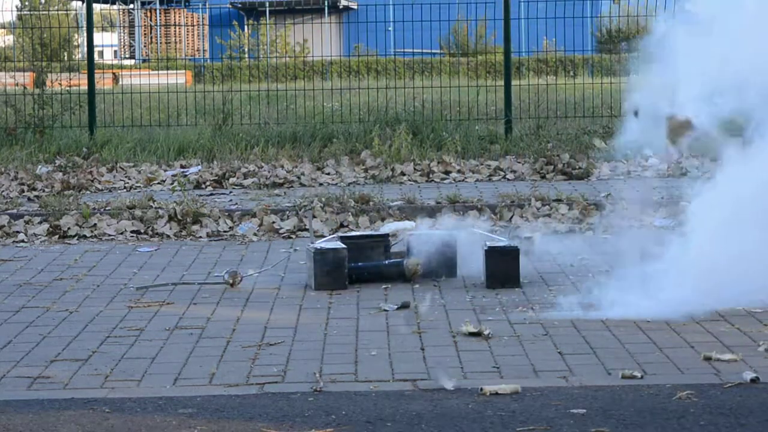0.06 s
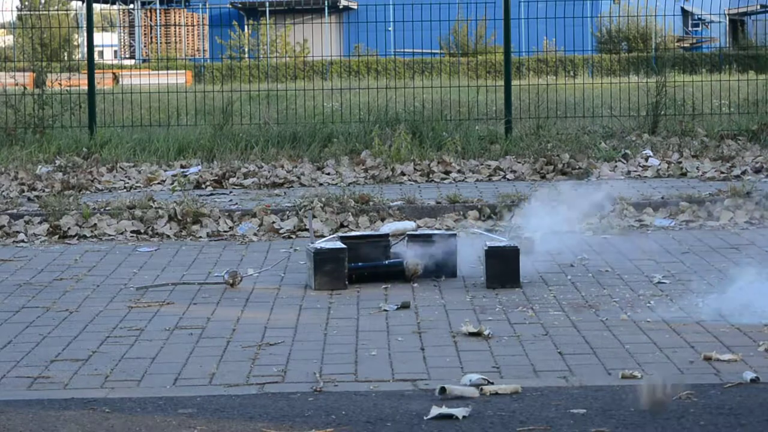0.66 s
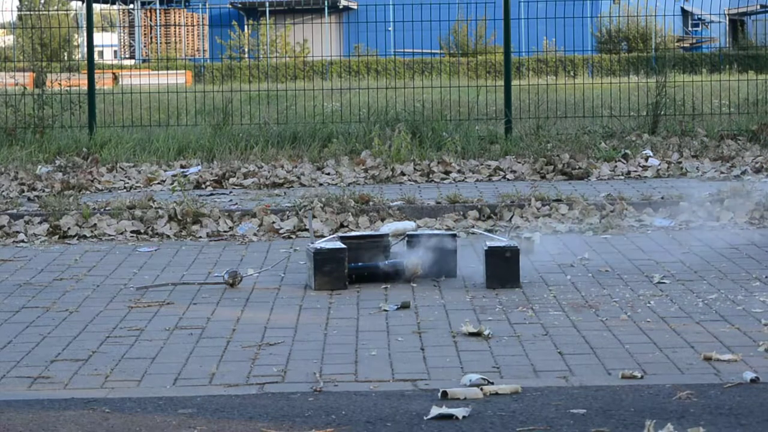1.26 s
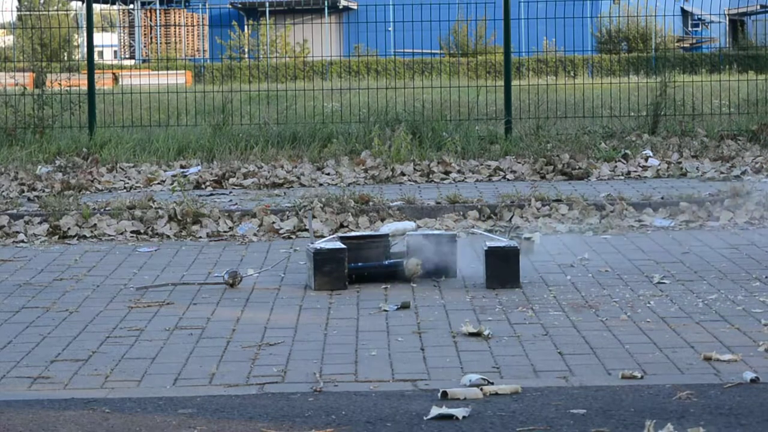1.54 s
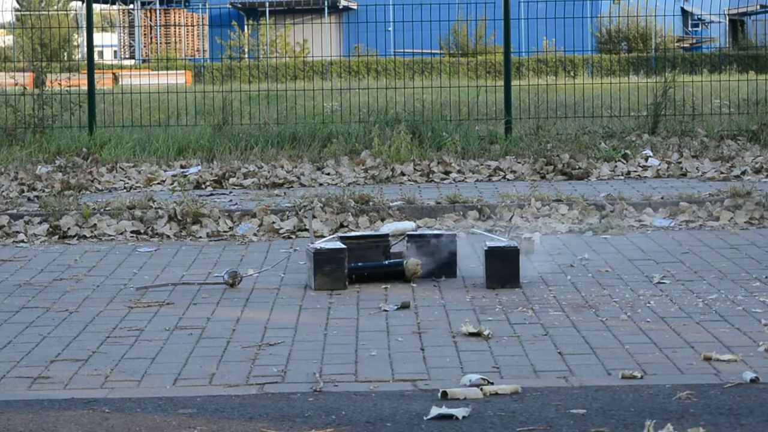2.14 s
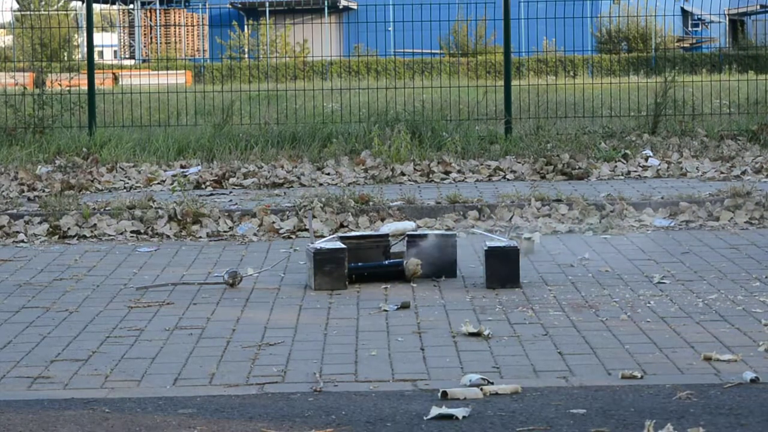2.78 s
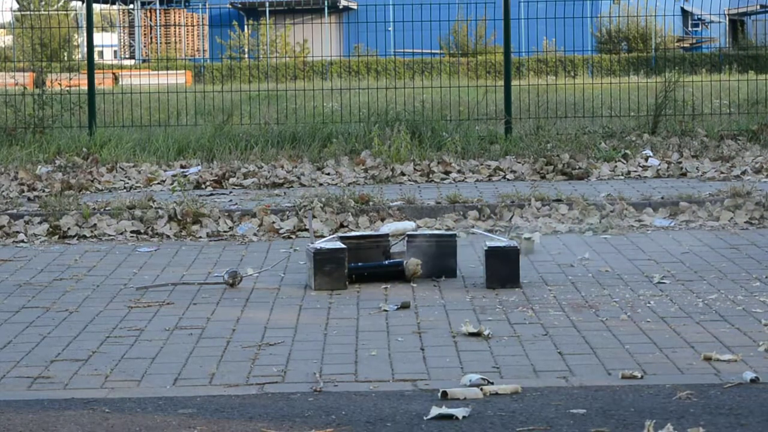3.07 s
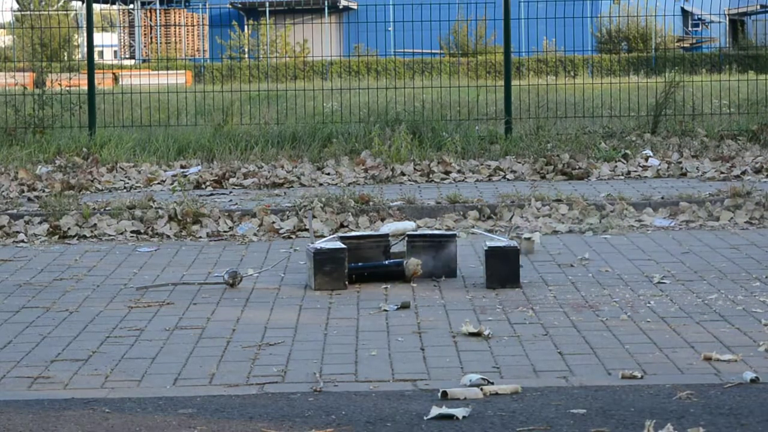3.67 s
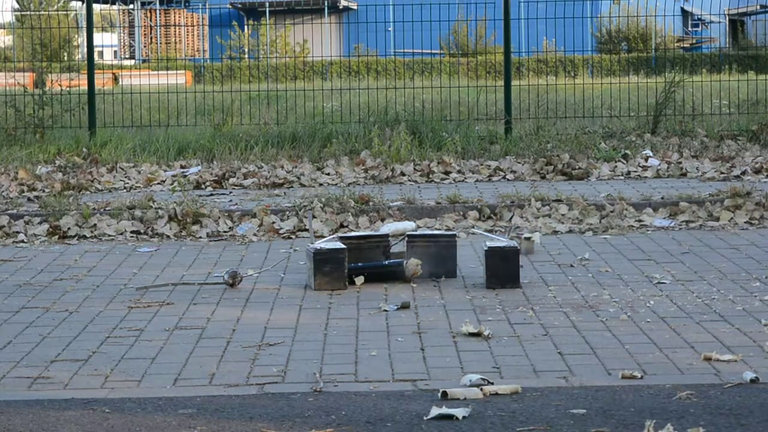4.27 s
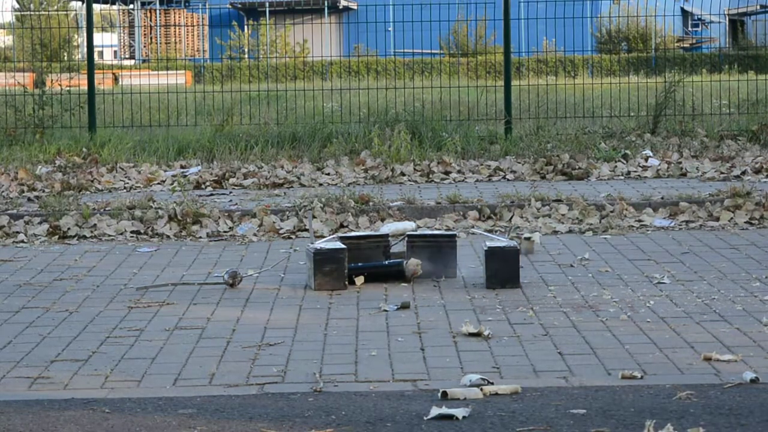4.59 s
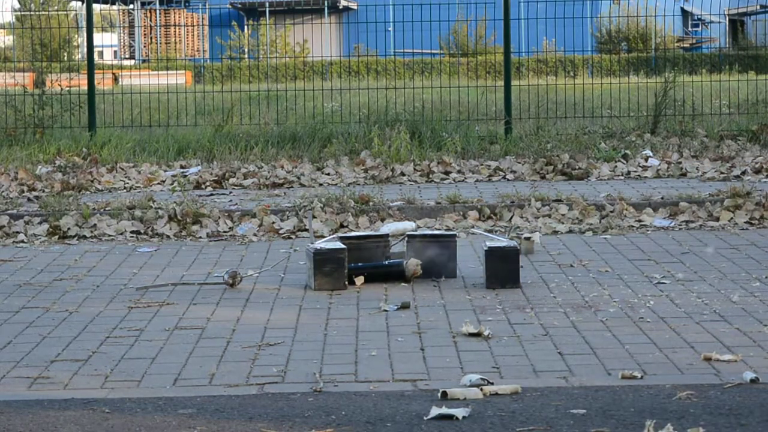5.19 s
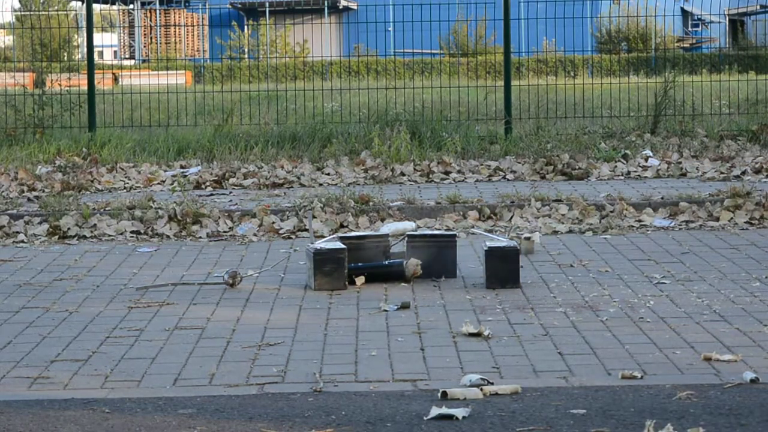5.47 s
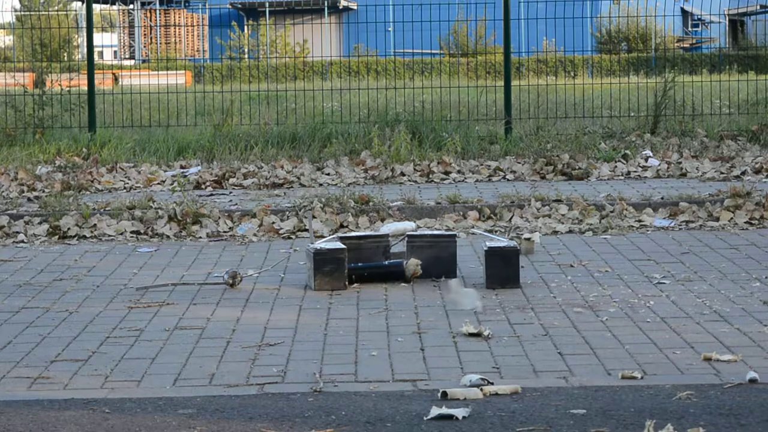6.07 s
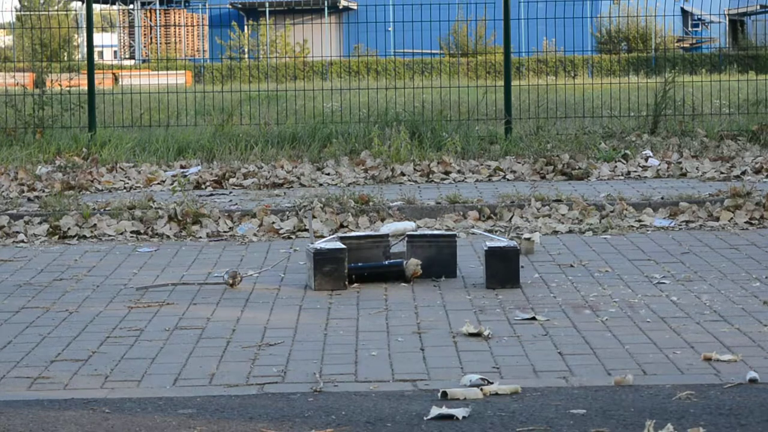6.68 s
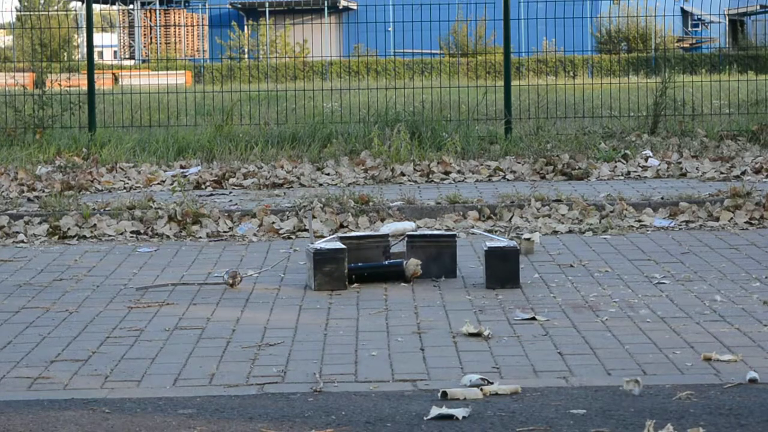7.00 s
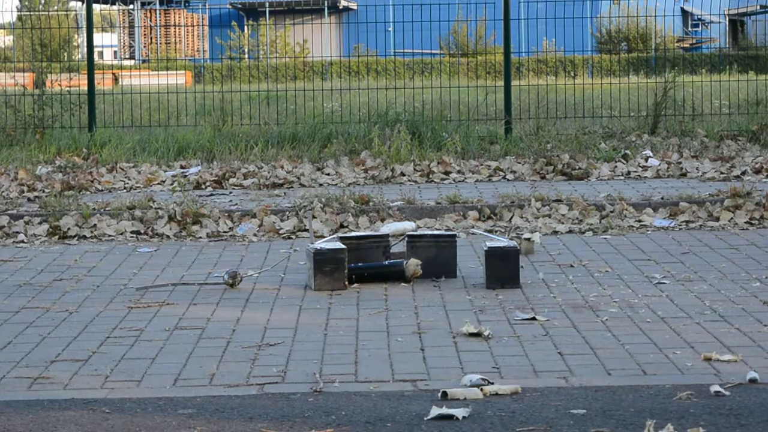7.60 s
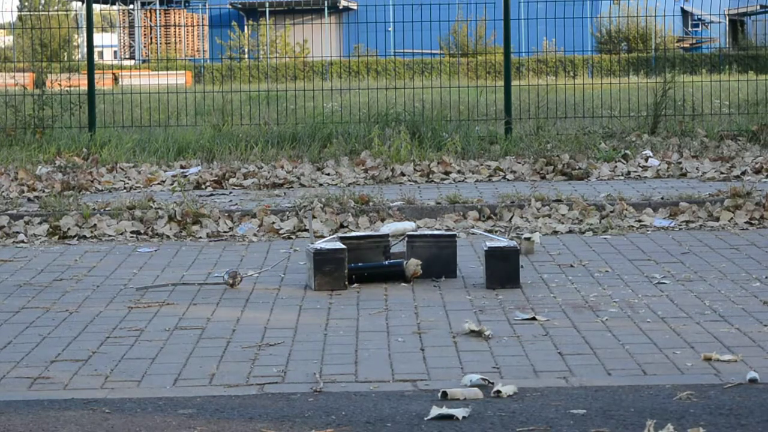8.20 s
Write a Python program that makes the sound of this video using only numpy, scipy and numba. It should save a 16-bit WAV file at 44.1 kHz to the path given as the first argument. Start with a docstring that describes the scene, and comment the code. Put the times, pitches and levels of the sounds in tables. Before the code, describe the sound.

A few light clicks of debris landing on pavement sound as gusts of wind begin to strike the microphone in an open yard. The wind rumbles and sputters unevenly between left and right, with a faint hiss rising and falling along with it. It drops away briefly, with barely audible caws from a far bird, then comes back in closely spaced, slightly brighter gusts until the end.

```python
"""A paved yard, where gusts of wind hit the two ports (openings) of a camera microphone.
Each port rumbles on its own as a gust builds, holds and drops away, leaving a weak wake.
Faster eddies (swirls of air) brighten the rumble and tear into short spits, and a thin hiss
comes and goes with the gusts. A few bits of debris land on the paving; a far bird caws faintly."""
import sys
import numpy as np
from scipy import signal
from scipy.fft import rfft, irfft, next_fast_len
from scipy.io import wavfile
from scipy.ndimage import uniform_filter1d, map_coordinates
from numba import njit

SR = 44100
rng = np.random.default_rng(int(sys.argv[2]) if len(sys.argv) > 2 else 0)


def waveform_to_disk(signal):
    """Save audio, clipped to [-1, 1], as 16-bit WAV at the path in sys.argv[1]."""
    frames = np.transpose(np.atleast_2d(signal))
    scaled = np.clip(frames, -1, 1) * 32767
    samples = np.round(scaled).astype(np.int16)
    wavfile.write(sys.argv[1], SR, samples)


N = 372644

# calls of the far bird: (start [s], length [s], relative level [dB], pitch [Hz], throat resonance [Hz])
BIRD_CAWS = [(1.141, 0.07, -61, 196, 1500), (1.571, 0.068, -53.5, 203.4, 1460),
             (1.805, 0.039, -50, 202, 1510), (2.358, 0.056, -53, 198.6, 1470),
             (2.539, 0.051, -63.5, 200, 1500), (2.695, 0.045, -75.5, 205.6, 1440),
             (2.915, 0.039, -54, 192, 1450)]
# bits of debris landing: (time [s], peak level [dB], brightness [Hz])
LANDINGS = [(0.3425, -46.5, 4450), (0.352, -38.5, 1300), (0.807, -36.5, 8850), (0.819, -31.5, 1980),
            (0.979, -32, 4500)]
# tones one bit rings with: (frequency [Hz], relative level [dB], time to fade by 60 dB [s])
DEBRIS_TONES = [(756, -16, 0.07), (910, -4, 0.018), (1640, -0.5, 0.016), (2600, 1.5, 0.0071),
                (4160, -7.5, 0.016), (8400, -37, 0.0091)]
# tone colour of the hiss: (frequency [Hz], relative level [dB])
HISS_COLOUR = [(80, -14), (250, -13), (1000, 11), (2200, 5.5), (3700, 3), (4900, -3.5), (6100, -6.5),
               (7800, -18), (10600, -15.5), (13000, -26), (15500, -47.5)]
# tone colour of tearing eddies: (frequency [Hz], relative level [dB])
SPIT_COLOUR = [(300, -4), (900, -1.5), (1600, 4), (3000, -7.5), (6000, -23.5), (8000, -26), (11000, -34),
               (15500, -38.5)]
# how a port responds to wind: (frequency [Hz], relative level [dB])
PORT_COLOUR = [(20, -33.5), (55, -26), (90, -9), (135, -12.5), (200, -2.5), (320, 1), (550, 4), (1000, 1.5),
               (3000, -18.5)]
# buffets, the sharpest shoves of air: (time [s], left surge [relative], right surge [relative])
SHARP_BUFFETS = [(0.566, 0, 2.8), (0.873, 1.6, 0), (1.049, 2.1, 1.0), (1.251, 0, 2.0), (1.286, 2.0, 0.6),
                 (1.919, 2.9, 1.0), (2.172, 2.0, 0), (2.975, 1.0, 2.9), (3.308, 1.0, 3.0), (3.559, 2.2, 0),
                 (3.628, 1.6, 0.6), (3.733, 2.0, 0.9), (3.837, 2.0, 1.0), (3.962, 0, 2.8),
                 (4.053, 1.9, 0.7), (4.186, 2.2, 1.4), (4.255, 1.8, 1.3), (4.403, 1.8, 1.1),
                 (4.929, 1.9, 1.2), (5.018, 1.8, 0.7), (5.311, 1.5, 0.8), (5.449, 2.0, 0), (5.571, 2.0, 0),
                 (5.669, 1.8, 0), (5.779, 1.8, 0.9), (6.07, 2.3, 1.2), (6.125, 1.7, 0), (6.776, 1.4, 0),
                 (6.91, 1.4, 0), (7.02, 1.8, 0), (7.069, 1.6, 0), (7.277, 2.2, 0.9), (7.431, 0, 2.1),
                 (7.623, 1.8, 0), (7.791, 1.5, 1.6), (7.833, 0, 2.0), (8.237, 1.8, 1.3)]
# gusts; the rumble's treble falls away above the corner, so a higher corner sounds brighter:
# (start [s], length [s], left level [dB], right level [dB], corner [Hz], hiss level [dB])
WIND_GUSTS = [(0.318, 0.045, -67, -76, 710, -72), (0.514, 0.045, -33.5, -35, 640, -59),
              (0.631, 0.123, -46, -35, 455, -63), (0.764, 0.084, -47, -39.0, 457, -64),
              (0.844, 0.085, -30.5, -29.5, 653, -58), (0.914, 0.12, -36.5, -29.5, 970, -62.5),
              (1.093, 0.2, -56, -46, 590, -73), (1.194, 0.2, -33, -32.5, 810, -59.5),
              (1.499, 0.11, -38.5, -55, 427, -69), (1.631, 0.066, -34, -38.5, 530.0, -64.5),
              (1.708, 0.15, -41, -42, 475, -67.5), (1.873, 0.043, -36.0, -33, 840, -58),
              (1.938, 0.25, -38.5, -43.5, 505, -67), (2.197, 0.12, -47, -51.5, 476, -71),
              (2.351, 0.046, -43.5, -39, 500, -67), (2.446, 0.062, -44.5, -51, 440.0, -72.5),
              (2.509, 0.12, -59.5, -55, 440, -80.0), (2.619, 0.13, -75.5, -72, 388, -99),
              (2.917, 0.13, -46, -38.5, 487, -65), (3.028, 0.072, -29.5, -35.5, 780, -59.5),
              (3.183, 0.048, -39, -42, 394, -71.5), (3.245, 0.058, -34, -35.5, 616, -60.5),
              (3.513, 0.241, -30, -30.5, 1210, -57.5), (3.755, 0.13, -37, -35, 925, -68),
              (3.896, 0.17, -32.5, -40.5, 1000, -64), (4.047, 0.15, -39.5, -56, 800, -69),
              (4.206, 0.12, -31, -38.5, 643, -65.0), (4.345, 0.26, -32, -35, 920, -65),
              (4.545, 0.12, -35, -40, 766, -76), (4.679, 0.062, -44.5, -49, 654, -80),
              (4.765, 0.08, -62, -67, 420.0, -92), (4.879, 0.055, -34, -47.0, 443, -68.5),
              (4.969, 0.13, -34, -44.0, 503, -67), (5.09, 0.11, -46.5, -47, 540.0, -73),
              (5.188, 0.16, -32.5, -40.5, 810.0, -63.5), (5.368, 0.21, -34.5, -40.5, 940, -61),
              (5.534, 0.27, -34, -41, 980, -62.5), (5.82, 0.098, -34.5, -43, 517, -69),
              (5.942, 0.048, -31.5, -37.5, 585, -66.5), (5.998, 0.13, -34.5, -46, 1260, -63.5),
              (6.198, 0.091, -38.5, -37.5, 535, -67.5), (6.376, 0.2, -36, -41.5, 755, -63.5),
              (6.592, 0.15, -33.5, -40.5, 920, -63), (6.721, 0.22, -30.5, -35, 1340, -61.5),
              (6.949, 0.162, -32.0, -39, 990, -70), (7.108, 0.2, -34.5, -35, 1037, -70.5),
              (7.351, 0.2, -38.5, -39, 886, -70.5), (7.576, 0.18, -33.5, -35.5, 660, -68),
              (7.752, 0.19, -34, -34, 980, -72), (7.944, 0.21, -39.0, -35.5, 865, -72.5),
              (8.152, 0.14, -37, -34.0, 990, -71.0), (8.291, 0.24, -43, -36.0, 704, -76.5)]

TOP_HZ = 15750
TIME = np.arange(N) / SR
GUST_TIME = np.arange(0, N / SR, .002)  # coarse steps are enough for the gusts' rise and fall


def gain(db):
    """Turn decibels into a factor to multiply by."""
    return 10 ** (np.asarray(db) / 20)


def unit_rms(x):
    """Scale a signal so its average strength (rms) is 1."""
    return x / np.sqrt(np.mean(x ** 2))


def coloured_noise(colour):
    """Noise of strength 1, shaped by a tone colour table."""
    hz, db = np.transpose(colour)
    size = next_fast_len(N, True)
    bin_hz = np.maximum(np.arange(size // 2 + 1) * SR / size, 1)
    shape = gain(np.interp(np.log(bin_hz), np.log(hz), db))
    return unit_rms(irfft(rfft(rng.standard_normal(size)) * shape, size)[:N])


def wobble(per_s):
    """A smooth random curve that takes about per_s new values a second."""
    steps = np.clip(rng.standard_normal(N // 10), -2, 2)
    return unit_rms(map_coordinates(steps, [TIME * per_s], order=2, mode="wrap"))


@njit
def filter_loop(x, tuning, damping):
    """Run a state-variable filter one sample at a time, so its tuning can move."""
    out, band, low = np.empty((2, len(x))), 0., 0.
    for i in range(len(x)):
        g = tuning[i]
        v = (band + g * (x[i] - low)) / (1 + g * (g + damping))
        out[0, i], out[1, i] = low + g * v, damping * v
        band, low = 2 * v - band, low + 2 * g * v
    return out


def resonate(x, hz, damping):
    """Filter x two ways: [0] keeps what is below hz, [1] keeps what is near hz."""
    tuning = np.tan(np.pi * np.clip(hz, 20, TOP_HZ) / SR) * np.ones(len(x))
    return filter_loop(x + 1e-18, tuning, float(damping))


def low_cut(x, hz):
    """Gently take away the bass below hz."""
    return signal.sosfilt(signal.butter(2, hz, "high", fs=SR, output="sos"), x)


def add(track, start_s, sound):
    """Mix a sound into a track at the given time."""
    start = int(start_s * SR)
    track[start:start + len(sound)] += sound[:N - start]


def noise_burst(t, fade_s):
    """Noise that dies away by 60 dB in fade_s."""
    return rng.standard_normal(len(t)) * np.exp(-np.log(1000) * t / fade_s)


def bird(pitch_fall=0.16, rasp=0.2, bird_db=-2, echo_db=-6):
    """Raspy caws: pulses falling in pitch ring the throat and echo faintly off the buildings."""
    caws = np.zeros(N)
    for start, length, db, pitch_hz, throat_hz in BIRD_CAWS:
        progress = np.linspace(0, 1, int(length * SR))
        cycles = np.cumsum(pitch_hz * (1 - pitch_fall * (progress - .5))) / SR
        pulses = np.diff(np.floor(cycles), prepend=0)
        voice = pulses + rasp * (1 - cycles % 1) ** 2 * rng.standard_normal(SR)[:len(progress)]
        for _ in range(2):
            voice = resonate(voice, throat_hz, damping=0.36)[1]
        add(caws, start, gain(db + bird_db) * unit_rms(voice) * np.sin(np.pi * progress))
    echo = noise_burst(TIME[:SR // 2], fade_s=0.35)
    return caws + gain(echo_db) * signal.fftconvolve(caws, echo / np.linalg.norm(echo))[:N]


def debris(crack_db=6, ring_db=-4):
    """Each bit lands with a crack and a brief ring, some bright, some dull."""
    ticks, t = np.zeros(N), TIME[:SR // 10]
    ring = sum(gain(db - 60 * t / fade_s) * np.sin(2 * np.pi * hz * t)
               for hz, db, fade_s in DEBRIS_TONES)
    for start, db, bright_hz in LANDINGS:
        crack = resonate(noise_burst(t, fade_s=0.026), hz=2400, damping=1.2)[1]
        tick = resonate(gain(ring_db) * ring + gain(crack_db) * crack, bright_hz, 1.5)[0]
        tick = low_cut(tick, 500)  # a small bit gives off no bass
        add(ticks, start, gain(db) * tick / np.abs(tick).max())
    return ticks


def gust_clock():
    """One row per gust: seconds since it began, seconds it has blown, seconds since it stopped."""
    start, length = np.transpose(WIND_GUSTS)[:2, :, None]
    age = GUST_TIME - start
    return age, np.clip(age, 0, length), np.maximum(age - length, 0)


def hiss_level(lead_s=0.017, rise_s=0.059, sag_db_per_s=24.5, fall_db_per_s=184.5, calm_db=-112):
    """Hiss level in dB: it starts just before each gust, sags while it blows, then fades."""
    peak_db = np.array(WIND_GUSTS)[:, -1:]
    age, blown, after = gust_clock()
    rise = np.clip((age + lead_s) / rise_s, 0, 1) ** 2
    swell = rise * gain(peak_db - sag_db_per_s * blown - fall_db_per_s * after)
    power = (swell ** 2).sum(axis=0) + gain(calm_db) ** 2
    return np.interp(TIME, GUST_TIME, 10 * np.log10(power))


def hiss(boost_db=6.5, side_db=-13, wide_db=-4, wide_hz=9000, flicker_db=1.5):
    """Airy hiss from ahead that sinks away between gusts; only its treble spreads wide."""
    mid, side = coloured_noise(HISS_COLOUR), coloured_noise(HISS_COLOUR)
    side = gain(side_db) * side + gain(wide_db) * resonate(side, wide_hz, 0.29)[1]
    level_db = hiss_level() + boost_db + flicker_db * wobble(40)
    return np.array([mid + side, mid - side]) * gain(level_db)


def airflow(port, rise_s=0.046, fall_db_per_s=376, wake_db=-18, wake_db_per_s=134.5,
            dull_db_per_octave=27.5, calm_db=-101, calm_hz=300):
    """Level (dB) and corner (Hz) at a port: gusts build, hold and drop, trailing weak eddies."""
    _, _, left_db, right_db, full_hz, _ = np.transpose(WIND_GUSTS)[:, :, None]
    age, _, after = gust_clock()
    rise = np.clip(age / rise_s, 0, 1) ** 2
    swell = rise * (gain(-fall_db_per_s * after) + gain(wake_db - wake_db_per_s * after))
    power = (swell * gain((left_db, right_db)[port])) ** 2
    # a gust gets duller as it weakens
    corner_hz = full_hz * (swell / (1 + gain(wake_db))) ** (20 * np.log10(2) / dull_db_per_octave)
    calm = gain(calm_db) ** 2
    total = power.sum(axis=0) + calm
    mean_hz = ((power * corner_hz).sum(axis=0) + calm * calm_hz) / total
    return np.interp(TIME, GUST_TIME, 10 * np.log10(total)), np.interp(TIME, GUST_TIME, mean_hz)


def wander(level_db, corner_hz, sway_db=2.0, sway_octaves=0.054, steady_db=-33):
    """The stream drifts off the port and back, swaying level and corner, more so in weak wind."""
    drift = wobble(30)
    weakness = np.clip((steady_db - level_db) / 7, .4, 1.3)
    sway = (np.minimum(drift, .5 * drift) + .2) * weakness  # dips go further than rises
    return level_db + sway_db * sway, corner_hz * 2 ** (sway_octaves * sway)


def buffets(port, strength=0.88, surge_s=0.0031, stall_s=0.0071, tail_s=0.024, strays_per_s=3):
    """Extra air speed at a port: in each buffet the air stalls, surges, then ebbs away."""
    lead_s = .04
    age = TIME[:SR // 10] - lead_s
    stall = 0.62 * np.exp(-(age / stall_s + 1.22) ** 2)
    tail = 0.18 * np.clip(age / surge_s, 0, 1) * np.exp(-np.abs(age) / tail_s)
    surge = np.exp(-(age / surge_s) ** 2) - stall + tail
    gaps, sizes = rng.random((N // 1000, 2)).T  # smaller stray buffets come at random
    stray_times = lead_s + np.cumsum(-np.log(1 - gaps)) / strays_per_s
    strays = list(zip(stray_times, 0.7 * (.5 + sizes)))
    sharp = [(when, both[port]) for when, *both in SHARP_BUFFETS]
    surges = np.zeros(N)
    for when, size in sharp + strays:
        if when < TIME[-1]:
            add(surges, when - lead_s, strength * size * surge)
    return surges


def eddy_speed(surges, big_eddies):
    """Air speed above or below its average: eddies of three sizes, which a buffet sweeps aside."""
    eddies = unit_rms(.55 * big_eddies + 0.68 * wobble(190) + 0.94 * wobble(600))
    return surges + eddies / (1 + .5 * np.abs(surges))


def thud(speed, octaves, hz=165, thud_db=-18, fall_db_per_octave=10):
    """A low thud in slow air, which fades as the wind gets brighter."""
    noise = rng.standard_normal(N) * gain(3.6 * speed)
    for _ in range(2):
        noise = resonate(noise, hz, 0.9)[1]
    return unit_rms(noise) * gain(thud_db - fall_db_per_octave * octaves)


def rip(surges, rip_hz=1700, top_hz=4200):
    """A short rasp where a buffet breaks on the rim of the port."""
    band = resonate(rng.standard_normal(N), rip_hz, 0.43)[1]
    rasp = resonate(band, top_hz, 1.4)[0]
    return unit_rms(rasp) * np.clip(surges, 0, 2)


def spits(speed, surges, level_db, octaves, spit_db=-27, flutter_db=6, db_per_octave=6):
    """The fastest eddies tear into spits, which grow with the wind faster than the rumble does."""
    force_db = .5 * (level_db + 42)
    tearing = unit_rms(coloured_noise(SPIT_COLOUR) * gain(flutter_db * np.minimum(speed, 2.7)))
    return gain(spit_db + db_per_octave * octaves + force_db) * (tearing + 1.8 * rip(surges))


def rumble(corner_hz, speed, flutter_db=3.5, flutter_octaves=0.26, ceiling=4.6):
    """Eddies press on the port: a faster one is louder and brighter, up to a soft ceiling."""
    pressure = coloured_noise(PORT_COLOUR)
    for _ in range(2):  # above the corner, eddies are smaller than the port and press far less
        pressure = resonate(pressure, corner_hz * 2 ** (flutter_octaves * speed), 1.45)[0]
    bass = resonate(pressure, 0.066 * corner_hz, 2.6)[1]
    pressure = pressure - 0.79 * bass  # the bass thins as the air speeds up
    pressure = pressure * gain(flutter_db * np.minimum(speed, 1.4))
    # even out slow changes: the gust sets the average pressure, the eddies only share it out
    power = uniform_filter1d(uniform_filter1d(pressure ** 2, size=2000), size=1400)
    return ceiling * np.tanh(pressure / np.sqrt(power) / ceiling)


def wind(port, big_eddies, rumble_db=0.75, sputter_db=2.5, push_db=1.5):
    """Wind on one port (0 is left, 1 is right): thud, spits and rumble follow the same moving air."""
    level_db, corner_hz = wander(*airflow(port))
    octaves = np.log2(corner_hz / 800)  # how bright the wind is
    surges = buffets(port)
    level_db = level_db + push_db * uniform_filter1d(surges, size=200)  # a buffet also presses harder
    speed = eddy_speed(surges, big_eddies)
    lows = thud(speed, octaves)
    highs = spits(speed, surges, level_db, octaves)
    # weak wind catches the port only in patches, strong wind stays on it
    patchiness = np.clip(-(level_db + 30.5) / 12, 0, 2)
    sputter = gain(sputter_db * patchiness * wobble(55))
    return gain(level_db) * sputter * (gain(rumble_db) * rumble(corner_hz, speed) + lows + highs)


def scene():
    """Only the big eddies reach both ports at once; the yard's sounds lie in the middle."""
    big_eddies = wobble(70)
    ports = np.array([wind(0, big_eddies), wind(1, big_eddies)])
    return ports + hiss() + debris() + bird()


def record(dry, low_cut_hz=75, bass_kept=0.52, overload_db=-19.5):
    """The hardest buffets overload the microphone; the camera thins the deep bass and cuts the top."""
    rounded = dry / (1 + (dry / gain(overload_db)) ** 4) ** (1 / 4)
    thinned = bass_kept * rounded + (1 - bass_kept) * low_cut(rounded, low_cut_hz)
    top_cut = signal.ellip(10, .2, 70, TOP_HZ, fs=SR, output="sos")
    return signal.sosfilt(top_cut, thinned)


dry = scene()
out = record(dry)
waveform_to_disk(out)
```